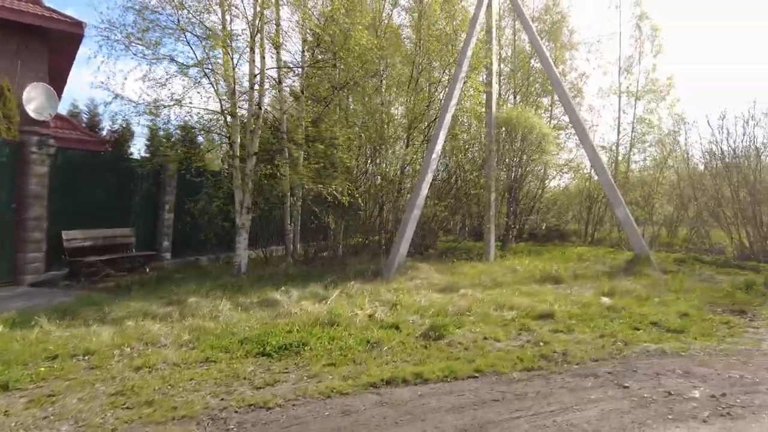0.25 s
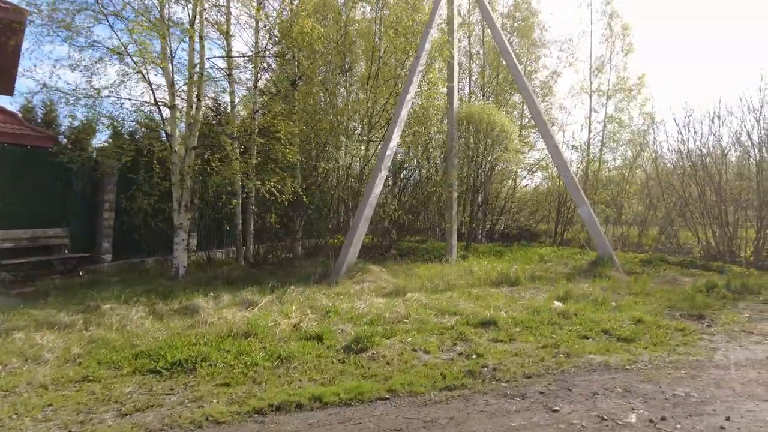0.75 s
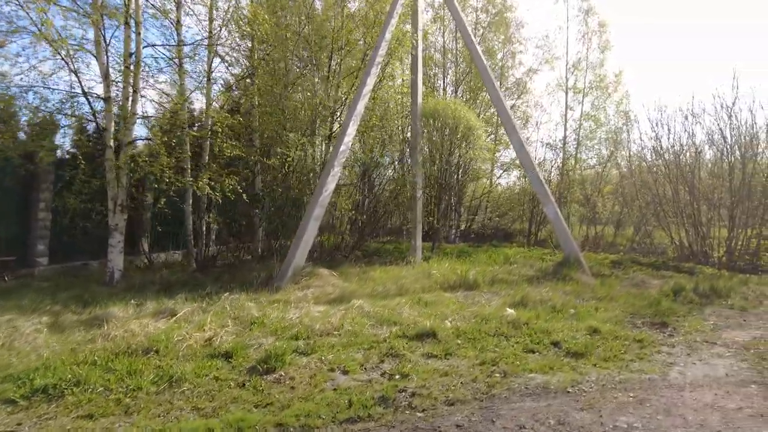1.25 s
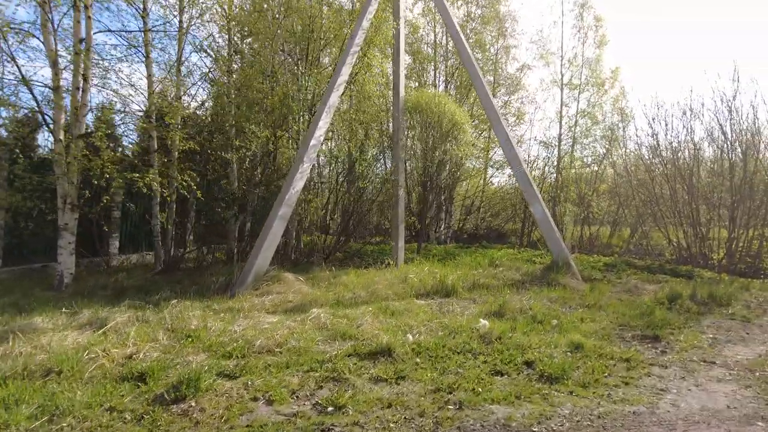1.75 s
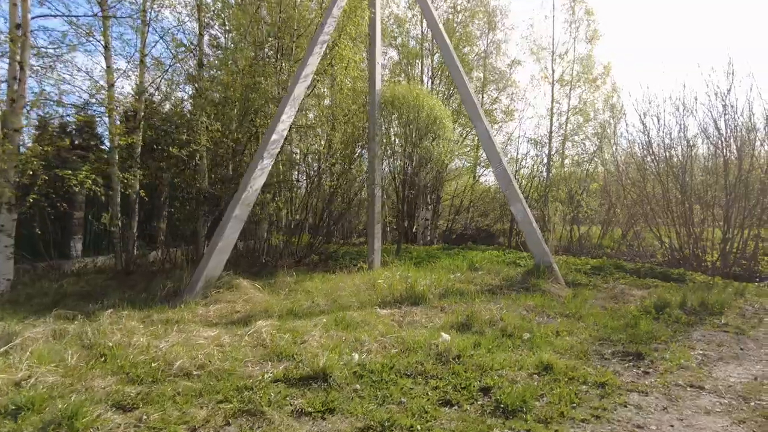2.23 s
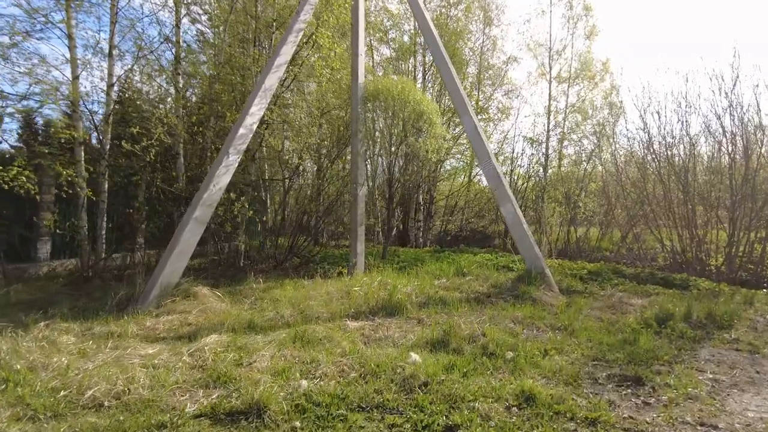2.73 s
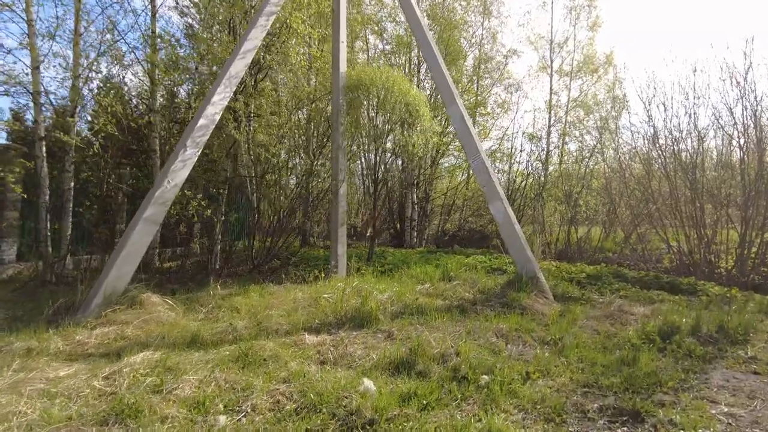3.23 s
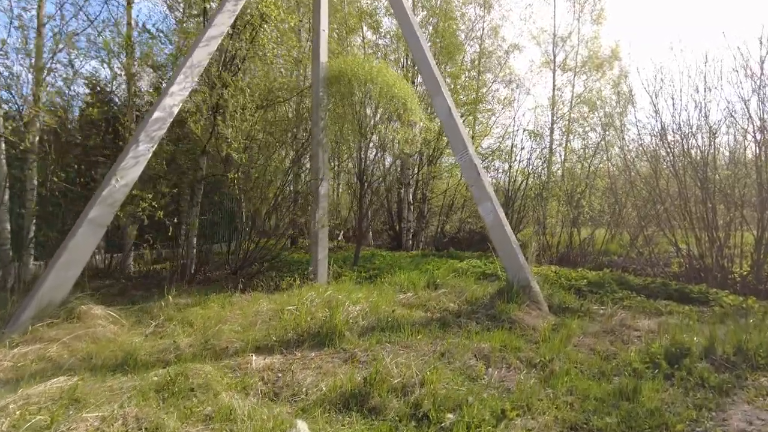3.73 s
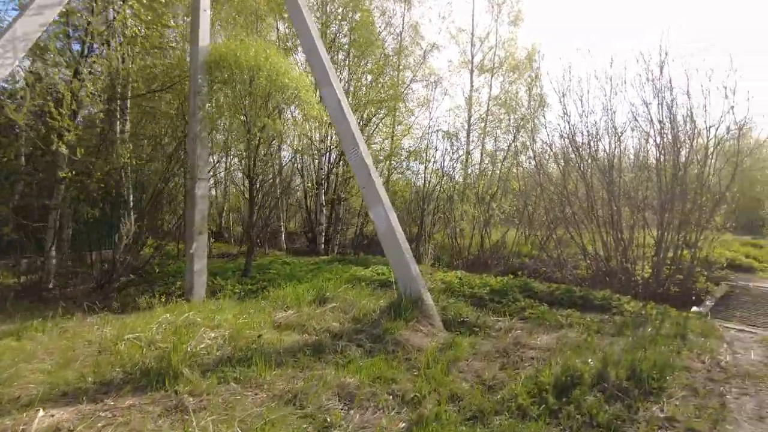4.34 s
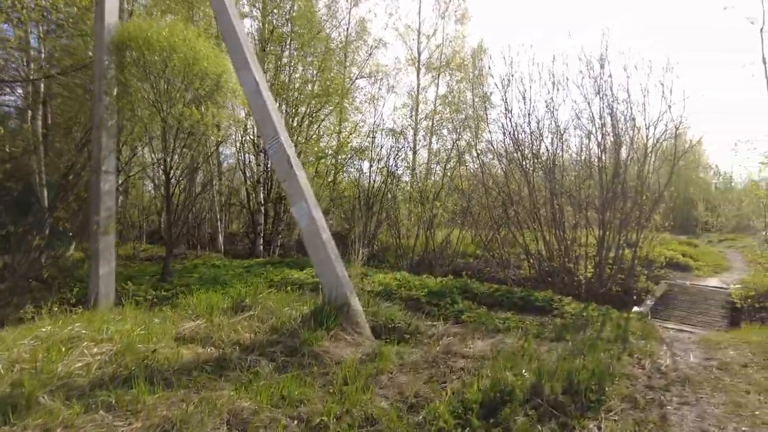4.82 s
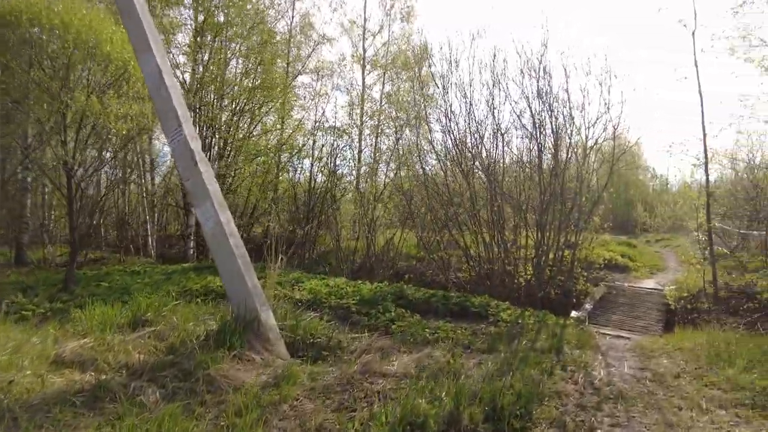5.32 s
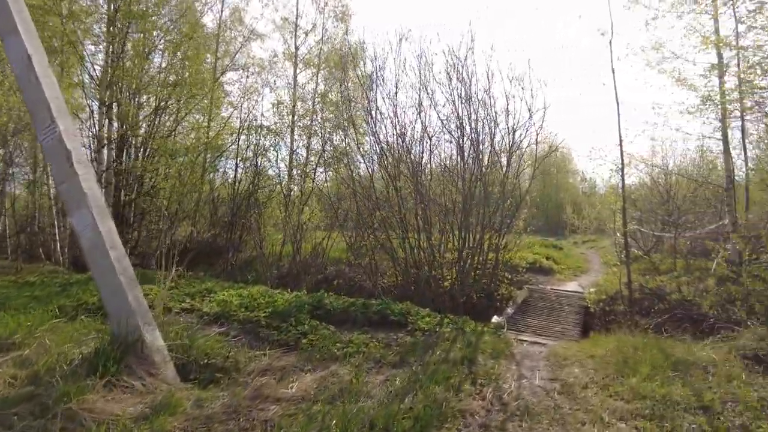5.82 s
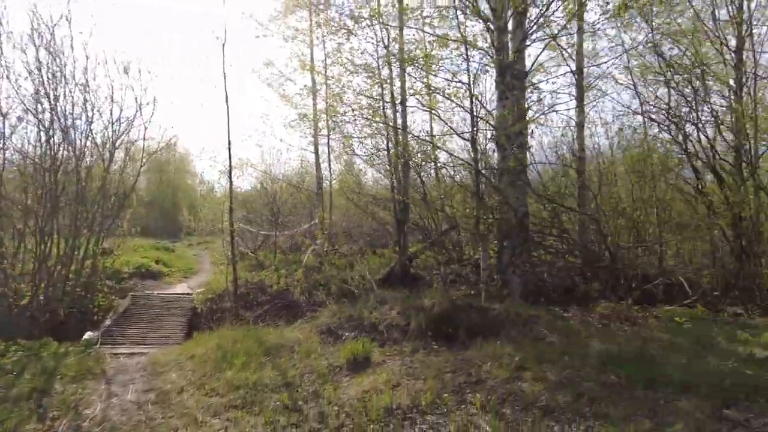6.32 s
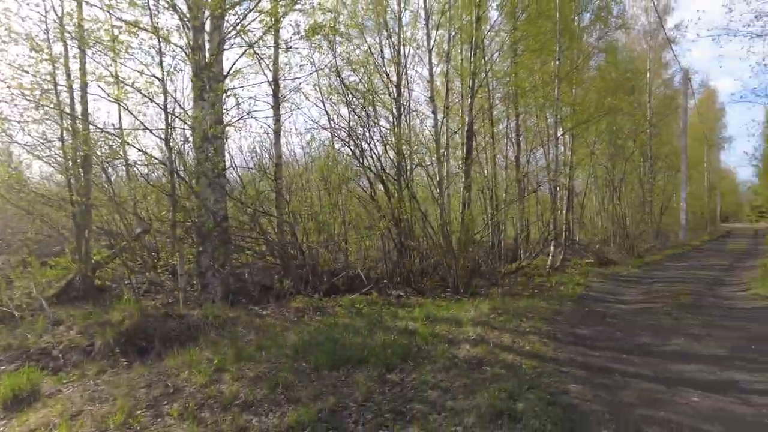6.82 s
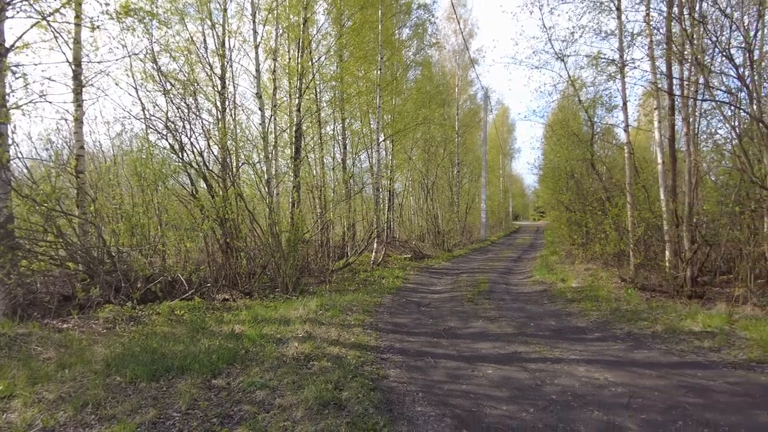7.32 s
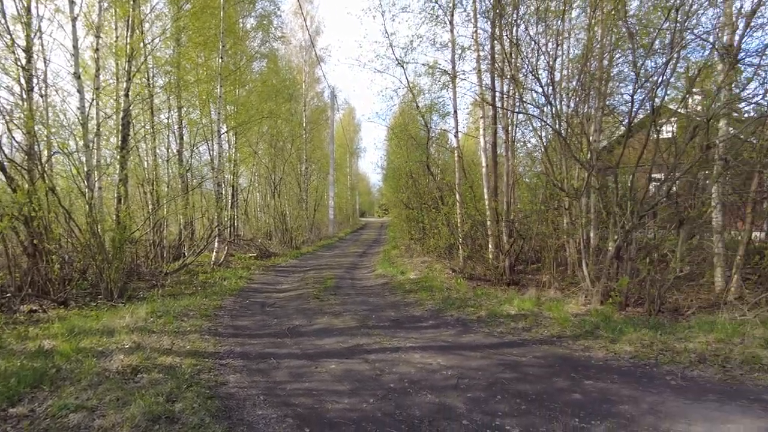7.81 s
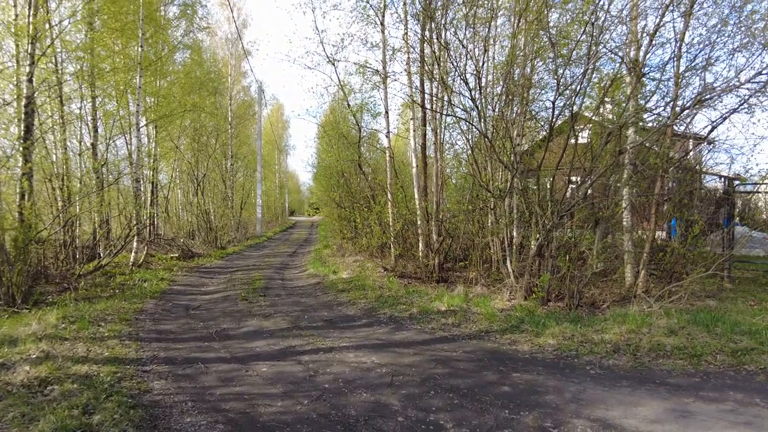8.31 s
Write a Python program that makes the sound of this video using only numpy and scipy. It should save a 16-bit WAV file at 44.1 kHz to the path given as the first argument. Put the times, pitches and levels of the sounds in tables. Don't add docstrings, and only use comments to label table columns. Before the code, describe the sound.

Outdoors by a birch wood, small birds whistle in quick sliding notes above a distant low rumble. After two seconds a sharp plastic snap starts rough handling: dull footstep thuds, creaking grip, hard pops, scrapes and swishing sleeve and grass. It calms after six seconds into a bubbling bird trill, a faint passing car, a tiny ping and thin chirps. Close stereo microphones in the hand.

```python
import sys
import numpy as np
from scipy import signal
from scipy.fft import rfft, irfft, next_fast_len
from scipy.io import wavfile
from scipy.ndimage import uniform_filter1d

SR = 44100
rng = np.random.default_rng(int(sys.argv[2]) if len(sys.argv) > 2 else 0)


def to_wav(sig):
    pcm = np.clip(np.atleast_2d(sig), -1, 1) * 32767
    pcm = np.round(pcm).astype(np.int16)
    wavfile.write(sys.argv[1], SR, pcm.T)


def nominal_scale(level):
    x = np.asarray(level, float) / 20
    return 10 ** x


N = 377471

# f/Hz, density/dB per Hz
CRACK_BAND = [(1500, -27), (2600, 4), (5200, -4), (7500, -28)]
# f/Hz, density/dB per Hz
SPARK_BAND = [(4500, -32), (6500, -1), (13500, -8.5), (16500, -25)]


def colour(x, points):
    hz, db = np.transpose(points)
    size = next_fast_len(N)
    f = np.maximum(np.arange(size // 2 + 1) * SR / size, 1)
    gain = nominal_scale(np.interp(np.log(f), np.log(hz), db)) * (f <= hz[-1])
    y = irfft(rfft(x, size) * gain, size)[..., :N]
    return y / np.sqrt(np.mean(y ** 2))


def walk(rate):
    hold = int(SR / rate)
    levels = np.repeat(rng.standard_normal(N // hold + 1), hold)
    return 2.0 * uniform_filter1d(uniform_filter1d(levels, hold), hold)[:N]


def ports(mid, side):
    return np.array([mid + side, mid - side])


def lean(sound, left_db):
    return sound * nominal_scale(np.array([[left_db], [-left_db]]))


def add(out, s, sound, pan_db=0, lag=0):
    sound = np.broadcast_to(sound, (2, sound.shape[-1]))
    for ch, (start, db) in enumerate([(int(s * SR) + lag, pan_db / 2), (int(s * SR), -pan_db / 2)]):
        part = sound[ch, :max(N - start, 0)]
        out[ch, start:start + len(part)] += nominal_scale(db) * part


def grit(share, size_db):
    slips = (rng.random((2, N)) < share) * nominal_scale(size_db * rng.random((2, N)))
    return rng.standard_normal((2, N)) * (1 + slips[0] + slips[1] / 2)


def strokes(rows, rise_db_s, fall_db_s):
    t = np.arange(0, N / SR, .001)
    s, length, db, drift_db = np.transpose(rows)[:, :, None]
    shape = db + drift_db * np.clip((t - s) / length, 0, 1) - rise_db_s * np.maximum(s - t, 0)
    shape = shape - fall_db_s * np.maximum(t - s - length, 0)
    gains = nominal_scale(np.maximum(shape, -200))
    return np.interp(np.arange(N) / SR, t, np.sqrt(np.sum(gains ** 2, axis=0)))


def patchy(x, edges_hz, slow_db, quick_db):
    size = next_fast_len(N)
    spectrum = rfft(x, size)
    octave = np.log2(np.maximum(np.arange(size // 2 + 1) * SR / size, 1))
    centres = np.log2(edges_hz)
    out = 0
    for row in np.eye(len(centres)):
        band = irfft(spectrum * np.interp(octave, centres, row), size)[..., :N]
        out = out + band * nominal_scale(slow_db * walk(14) + quick_db * walk(90))
    return out


def grip_clicks():
    # t/s, peak/dB, crack over ring/dB, sparkle over ring/dB, left minus right/dB
    ticks = [
        (1.5812, -44.5, -20, -40, -15),
        (1.7748, -42.5, -7, -17, -7),
        (2.136, -44, -15, -30, 9),
        (3.0097, -41, -7, -21, 5),
        (4.931, -54, 10, 13.5, -12),
        (5.5424, -36, -0.5, -25, 6),
        (7.3644, -47, -4, -33, -20),
    ]
    # t/s, peak/dB, ring f/Hz, crack over ring/dB, left minus right/dB
    pops = [(2.303, -36.5, 1650, -24, 0), (2.794, -41, 2600, 2, 9), (3.2553, -24.5, 2730, -12, -9),
            (3.2589, -12.5, 1840, -14.5, -7.5), (3.2624, -19.5, 1980, -15, -8),
            (3.265, -21.5, 1890, -12.5, 7), (3.725, -33, 1830, -24, -6), (3.799, -26.5, 1800, -25, -12),
            (3.8206, -32, 1860, -24, -10), (3.8443, -28, 1780, -13, -14), (4.0017, -30, 1680, -6.5, -16),
            (4.0043, -31, 1750, -22, -8), (4.013, -22.5, 1600, -28, -1), (4.0227, -29, 1820, -17, -22),
            (7.365, -41, 1570, -24, -22), (7.37, -50, 1600, -20, -10)]
    tick_hz, flex_hz, flex_db, t60_s = 1280, 970, -15, 0.015
    out, t = np.zeros((2, N)), np.arange(SR // 8) / SR
    hiss = colour(rng.standard_normal((2, N)), CRACK_BAND)
    fizz = colour(rng.standard_normal((2, N)), SPARK_BAND)
    flash = np.exp(-((t - .0008) / 0.00043) ** 2)
    fade = (1 - np.exp(-t / 0.0009)) ** 2 * np.exp(-np.log(1000) * t / t60_s)
    fade = fade / fade.max()
    every = [(s, db, tick_hz, crack, spark, pan) for s, db, crack, spark, pan in ticks]
    every += [(s, db, hz, crack, crack - 5.5, pan) for s, db, hz, crack, pan in pops]
    for s, db, hz, crack_db, spark_db, pan_db in every:
        here = slice(int(s * SR), int(s * SR) + len(t))
        shell = np.sin(2 * np.pi * hz * t) + 0.67 * np.sin(2 * np.pi * 0.916 * hz * t)
        crack = 0
        for band_db, band in ((crack_db, hiss), (spark_db, fizz)):
            burst = band[:, here] * flash
            crack = crack + nominal_scale(band_db) * burst / np.abs(burst).max()
        add(out, s, nominal_scale(db - 8.5) * (shell * fade + nominal_scale(13.0) * crack), pan_db)
        flex = np.sin(2 * np.pi * flex_hz * t) * fade
        add(out, s, nominal_scale(db + flex_db) * ports(0, flex))
    return out


def catch_snap():
    # f/Hz, level/dB, swell/s
    shell_modes = [(428, -22, 0.00074), (1385, -8, 0.00049), (1600, -7.5, 0.00053), (2950, -21.5, 0.00067),
                   (4200, -17.5, 0.00045), (4900, -26.5, 0.00054), (6230, -37, 0.00056),
                   (7670, -26.5, 0.00032), (13000, -18, 0.000093)]
    # f/Hz, level/dB, swell/s
    bend_modes = [(555, -24, 0.001), (917, -5, 0.00048), (2600, -23, 0.00039), (5200, -24, 0.00098),
                  (12900, -24, 0.00034)]
    snap_s, pan_db, crack_db, spark_db = 2.4307, -5, -24, -27
    out, t = np.zeros((2, N)), np.arange(SR // 20) / SR

    def ring(modes):
        total = 0
        for hz, db, swell in modes:
            envelope = (t / swell) ** 2 * np.exp(2 - t / swell) / 4
            total = total + nominal_scale(db) * envelope * np.sin(2 * np.pi * hz * t)
        return total

    add(out, snap_s, ring(shell_modes), pan_db)
    add(out, snap_s, ports(0, ring(bend_modes)))
    hiss = colour(rng.standard_normal((2, N)), CRACK_BAND)[:, :len(t)]
    fizz = colour(rng.standard_normal((2, N)), SPARK_BAND)[:, :len(t)]
    burst = np.exp(-((t - .0009) / 0.00081) ** 2)
    add(out, snap_s, (nominal_scale(crack_db) * hiss + nominal_scale(spark_db) * fizz) * burst)
    return out


def arm_thuds():
    # t/s, length/s, level/dB, drift/dB
    jolts = [(.0, .6, -56.5, 3), (.672, 0.04, -48, 2.5), (1.155, 0.033, -45.5, -3), (1.45, 0.43, -58, 8.5),
             (2.05, 0.21, -59, 13), (2.425, 0.015, -44.5, 3.5), (2.5, 0.31, -49.5, 8),
             (2.91, 0.25, -39, -8), (3.2, 0.36, -44, 0), (3.64, 0.034, -38, -2), (3.72, 0.19, -46.5, 3.5),
             (3.98, 0.43, -46, -9.5), (5.46, 0.43, -62, -6)]
    # f/Hz, density/dB per Hz
    thud_band = [(53, -46), (90, 2.5), (162, -5), (220, -8.5), (297, -12), (350, -11), (900, -24),
                 (1170, -45), (1980, -120)]
    rest_db = -67.5
    jolt = np.hypot(nominal_scale(rest_db), strokes(jolts, rise_db_s=404, fall_db_s=88))
    mid, side = colour(rng.standard_normal((2, N)), thud_band) * jolt * nominal_scale(2.4 * walk(50) - 2.7)
    return lean(ports(mid, nominal_scale(-14.0) * side), .6)


def low_knocks():
    # t/s, peak/dB, f/Hz, t60/s
    knocks = [(0.154, -42, 263, 0.047), (0.672, -42, 600, 0.02), (0.676, -43.5, 235, 0.059),
              (1.154, -47, 500, .03), (1.171, -45, 151, 0.067), (2.427, -29, 237, 0.065),
              (2.785, -36, 146, 0.12), (3.008, -35, 184, 0.061), (2.929, -40, 375, 0.026),
              (3.202, -29.5, 119, 0.047), (3.2584, -27.5, 334, 0.035), (3.647, -26.5, 216, 0.079),
              (4.742, -35.5, 222, 0.034), (5.543, -28, 610, 0.0034)]
    out, t = np.zeros((2, N)), np.arange(SR // 8) / SR
    for s, db, hz, t60 in knocks:
        add(out, s, nominal_scale(db) * np.sin(2 * np.pi * hz * t) * np.exp(-np.log(1000) * t / t60))
    return out


def grip_creaks():
    # t/s, length/s, level/dB, drift/dB
    slides = [(.09, 0.17, -64, -3.5), (.29, 0.054, -61.5, 7), (.68, 0.099, -66, 3), (.89, 0.055, -67, 0),
              (1.15, 0.19, -66, -5), (1.65, 0.22, -67, -4), (2.07, 0.23, -77, 17.5),
              (2.45, 0.37, -52.5, -1.5), (2.89, 0.064, -59.5, 5.5), (3.015, 0.056, -52.5, -2),
              (3.17, 0.069, -58.5, 5), (3.285, 0.3, -53, -13.5), (3.61, 0.17, -51, -2.5),
              (3.795, 0.15, -46.5, -5), (3.998, 0.1, -41.5, -16), (4.13, 0.052, -60.5, 8),
              (4.22, 0.14, -64, -13), (4.65, 0.088, -58.5, 2.5), (4.81, 0.064, -59, -2),
              (4.92, 0.69, -59.5, -5.5), (5.705, 0.078, -66, -4), (5.97, 0.36, -65, 3), (6.98, 0.3, -70, 9),
              (7.3, 0.5, -64, -8), (7.885, 0.085, -70, -5), (2.45, 1.3, -63, -7)]
    # f/Hz, density/dB per Hz
    creak_band = [(410, -10), (700, -8.5), (824, -5.5), (948, -11.5), (1490, -5), (1800, -3.5), (2110, -12),
                  (2690, -6), (3450, -11), (4500, -17), (5850, -15.5), (9900, -120)]
    slide = strokes(slides, rise_db_s=795, fall_db_s=600)
    creak = colour(grit(share=0.0037, size_db=-1.0), creak_band) * slide * nominal_scale(1.37 * walk(80) + 1.47)
    return lean(patchy(creak, [700, 1440, 2450, 4000], slow_db=1.3, quick_db=1.43), -1.6)


def scrapes():
    # t/s, length/s, f/Hz, width/Hz, level/dB
    edges = [(0.31, 0.041, 1880, 1800, -51.5), (.315, 0.049, 1320, 500, -54),
             (2.423, 0.013, 1500, 2000, -42), (2.46, .09, 1600, 600, -59), (2.556, 0.11, 1700, 600, -52),
             (2.682, 0.079, 1660, 600, -64), (2.566, 0.09, 6000, 4000, -59), (2.68, 0.039, 9000, 4000, -52),
             (2.746, 0.077, 3130, 1500, -47), (2.758, 0.076, 9000, 5000, -68),
             (3.001, 0.088, 4900, 1300, -50.5), (3.312, 0.098, 4500, 3560, -49),
             (3.463, 0.083, 3560, 1990, -52.5), (3.584, 0.31, 3800, 2500, -51.5),
             (3.723, 0.23, 1920, 603, -47), (3.844, 0.078, 2680, 500, -47.5),
             (3.983, 0.075, 1190, 490, -43), (4.057, 0.026, 6000, 2000, -48),
             (4.13, 0.017, 9500, 1500, -47), (4.146, 0.063, 2640, 2000, -52),
             (4.263, 0.024, 9700, 6000, -51.5), (4.303, 0.031, 8000, 7000, -59.5),
             (4.358, 0.017, 8000, 6000, -54.5), (4.582, 0.027, 9500, 7000, -55.5),
             (4.682, 0.042, 2200, 2000, -62), (4.808, .045, 1900, 1600, -52.5),
             (4.966, 0.042, 3470, 2500, -54), (5.074, 0.08, 3000, 1300, -57),
             (5.15, 0.034, 5760, 2500, -50), (5.135, 0.042, 9500, 5000, -62),
             (5.244, 0.27, 6050, 1480, -49), (5.394, 0.059, 8000, 7000, -51),
             (5.387, 0.048, 2500, 1500, -56), (5.504, 0.14, 5460, 2500, -59),
             (6.211, .025, 11000, 7000, -65), (6.266, 0.076, 9000, 9000, -62),
             (7.2, 0.086, 3470, 2600, -57)]
    # t/s, length/s, f/Hz, width/Hz, level/dB
    further_scrapes = [
        (2.83, 0.061, 2900, 1600, -62.5),
        (3.08, 0.089, 5200, 2000, -60),
        (3.545, 0.075, 3600, 1800, -59),
        (3.6, .15, 2800, 400, -55),
        (3.715, 0.042, 1750, 300, -54),
        (4.085, .06, 2950, 900, -56),
        (4.2, 0.08, 3280, 1600, -67),
        (4.39, .16, 2950, 1300, -66),
    ]
    out = np.zeros((2, N))
    rough = grit(share=0.0061, size_db=16.5) * nominal_scale(1.4 * walk(90))
    for s, length, hz, width_hz, db in edges + further_scrapes:
        band = signal.butter(2, [hz - width_hz / 2, hz + width_hz / 2], "band", fs=SR, output="sos")
        burst = signal.sosfilt(band, rough[:, int(s * SR):int((s + length) * SR)])
        shape = np.sin(np.pi * np.linspace(0, 1, burst.shape[1]) ** 0.91) ** .5
        add(out, s, nominal_scale(db) * burst / burst.std() * shape, pan_db=-1.5)
    return out


def brushing():
    # t/s, length/s, level/dB, drift/dB
    brushes = [(.0, 0.21, -80.5, -2), (.28, 0.032, -80, 16.5), (.905, 0.041, -81, -3),
               (1.15, 0.15, -83.5, 2), (2.01, 0.11, -81, -1), (2.19, 0.14, -75, 6),
               (2.44, 0.046, -53.5, -8), (2.5, 0.32, -61.5, 8), (2.785, 0.071, -49, -10),
               (2.87, 0.079, -66, 5.5), (3.015, 0.067, -56.5, -2), (3.15, 0.39, -58, -6.5),
               (3.6, 0.31, -58, 0.5), (3.9, 0.28, -58.5, 0), (4.265, 0.049, -65, -10),
               (4.357, 0.18, -67, 0), (4.585, 0.028, -63, -6), (4.62, 0.52, -65, -10),
               (5.13, 0.033, -69, 16), (5.2, 0.033, -61.5, 5), (5.26, 0.216, -53.5, 1.5),
               (5.49, 0.16, -54, -14), (5.69, 0.078, -62.5, 3), (5.85, 0.15, -74, 9), (6.15, 0.17, -87, 23),
               (2.45, 3.76, -68, -7.5), (6.962, 0.043, -67, -2), (7.06, 0.33, -76, 2.5),
               (7.39, 0.11, -66.5, 3), (7.53, 0.24, -68, -13.5)]
    # f/Hz, density/dB per Hz
    swish_band = [(2120, -46), (3600, -23), (4410, -0.5), (5970, -4.5), (6970, -6), (11500, -7.5),
                  (12600, -11), (15800, -11.5)]
    brush = strokes(brushes, rise_db_s=903, fall_db_s=602)
    swish = colour(grit(share=0.0023, size_db=9), swish_band) * brush * nominal_scale(1.5)
    swish = patchy(swish, [4500, 6500, 9000, 12500], slow_db=0.9, quick_db=1.45)
    return lean(ports(swish[0], swish[1]), .8)


def flecks():
    # t/s, peak/dB, f/Hz, left minus right/dB
    grains = [(.041, -52, 7500, 0), (.098, -48.5, 9000, 9), (.105, -44, 2700, -5), (.286, -52, 8000, 0),
              (.461, -54, 2800, -6), (.775, -54, 10000, 3), (.948, -53, 5800, -2),
              (1.583, -47.5, 2600, -10), (1.669, -48, 2500, -2), (1.746, -51, 5000, 0),
              (1.777, -47, 5500, -7), (2.067, -54, 4800, 0), (2.114, -52, 2780, 4), (2.136, -47, 2600, 4),
              (2.27, -48, 6500, 2), (2.294, -50, 2500, 0), (2.699, -38, 8000, 4), (2.794, -27, 8000, 10),
              (2.811, -33, 9000, 5), (2.935, -38, 5000, -12), (3.011, -40, 4600, -3), (3.26, -35, 4500, -6),
              (3.788, -46, 5000, -3), (4.004, -28, 6000, -8), (4.858, -44, 2000, 0), (5.225, -37, 8600, -8),
              (5.908, -47, 4500, -10), (6.612, -54, 4000, -4), (6.816, -48, 9500, -5),
              (6.816, -51, 3200, -5)]
    # t/s, peak/dB, f/Hz, left minus right/dB
    pings = [
        (7.3652, -40, 2980, -14),
        (7.3651, -35, 4500, -15),
        (4.3, -48, 8700, -4),
    ]
    out, t = np.zeros((2, N)), np.arange(-SR // 500, SR // 500) / SR
    for events, turns in ((grains, 0.93), (pings, 2.1)):
        for s, db, hz, pan_db in events:
            wavelet = np.sin(2 * np.pi * hz * t) * np.exp(-(t * hz / turns) ** 2)
            add(out, s + t[0], nominal_scale(db) * wavelet, pan_db)
    return out


def song(notes, bend, pan_db, lag_s, wobble_hz, echo_db, echo_s, rattle_hz=0):
    rattle_per_s, faint_hz_s = 80, 49300
    out = np.zeros((2, N))
    waver = wobble_hz * walk(300) + rattle_hz * np.sin(2 * np.pi * rattle_per_s * np.arange(N) / SR)
    for s, length, start_hz, end_hz, db in notes:
        u = np.arange(int(length * SR)) / (length * SR)
        left_to_go = (np.exp(-bend * u) - np.exp(-bend)) / (1 - np.exp(-bend))
        slide = end_hz + (start_hz - end_hz) * left_to_go
        strength = np.sin(np.pi * u) ** 0.3 / (1 + np.abs(np.gradient(slide)) * SR / faint_hz_s)
        hz = slide + np.roll(waver, -int(s * SR))[:len(u)]
        note = strength * np.sin(2 * np.pi * np.cumsum(hz) / SR)
        add(out, s, nominal_scale(db + 7.5) * note, pan_db, lag=int(lag_s * SR))
    t = np.arange(SR // 2) / SR
    trunks = rng.standard_normal((2, len(t))) * np.exp(-t / echo_s) * (t > .004)
    trunks = trunks / np.sqrt(np.sum(trunks ** 2, axis=1, keepdims=True))
    echo = signal.fftconvolve(out, trunks, axes=1)[:, :N]
    return out * nominal_scale(1.27 * walk(130)) + nominal_scale(echo_db) * echo


def birds():
    # t/s, length/s, start f/Hz, end f/Hz, level/dB
    warbler = [
        (.593, 0.051, 5920, 4360, -56.5),
        (.686, 0.046, 4800, 4200, -57),
        (.947, 0.022, 4680, 4080, -59),
        (6.152, 0.074, 7900, 7680, -62),
    ]
    dives = [
        (.77, 0.032, 4520, 4140, -56.5),
        (.798, 0.025, 4200, 3100, -64),
        (.922, 0.038, 4740, 4570, -63.5),
        (.97, .015, 3800, 3300, -74),
    ]
    risers = [
        (.826, 0.05, 3300, 4120, -60.5),
        (.99, 0.055, 3360, 4270, -60),
    ]
    gliders = [
        (1.608, 0.088, 4450, 5000, -78),
        (1.953, 0.05, 6950, 5300, -76),
        (2.138, 0.042, 6300, 5250, -71),
        (2.32, 0.058, 6360, 5360, -72),
        (2.33, 0.044, 5100, 4600, -78),
    ]
    thrush = [
        (6.962, 0.075, 7900, 5640, -70),
        (7.1, 0.04, 6370, 5330, -69.5),
        (7.615, 0.056, 4050, 4070, -71),
        (7.67, 0.031, 4120, 4070, -68),
        (7.905, 0.08, 4100, 4040, -77),
        (8.01, .06, 4080, 4080, -81),
        (8.262, 0.034, 7600, 5350, -59),
        (8.465, 0.038, 3650, 3130, -74),
    ]
    buzzer = [(.0, 0.04, 6050, 5840, -78), (.1, .05, 6140, 6050, -78), (.21, 0.04, 6500, 6500, -76),
              (.275, .025, 5200, 5340, -78), (.275, .025, 6500, 6400, -77), (.34, 0.06, 5960, 5970, -75),
              (.36, .05, 4900, 5100, -80), (.41, 0.042, 5740, 5700, -76), (.41, .045, 6650, 6540, -83)]
    rattler = [(.512, 0.024, 4950, 5430, -71), (.545, .02, 4900, 6400, -71), (.56, .035, 6200, 6000, -75),
               (.565, .03, 4750, 5200, -69), (8.165, 0.057, 4860, 7950, -69.5),
               (8.29, 0.074, 6030, 5900, -76), (8.35, 0.16, 4530, 4220, -70), (8.44, 0.13, 4680, 4660, -78)]
    # t/s, f/Hz, level/dB
    blips = [(6.453, 3750, -53), (6.464, 3680, -53), (6.487, 3810, -50), (6.496, 3040, -66),
             (6.506, 3600, -59), (6.534, 2950, -64), (6.548, 3680, -56), (6.557, 3270, -59),
             (6.573, 4000, -51.5), (6.594, 3480, -56), (6.609, 3700, -59), (6.623, 4000, -59),
             (6.632, 3130, -63), (6.644, 3530, -56), (6.664, 3230, -64), (6.687, 4230, -54),
             (6.694, 3300, -66), (6.707, 3170, -66), (6.744, 3660, -57), (6.769, 3690, -53),
             (6.858, 3740, -58)]
    trill = [(s, 0.011, hz + 100, hz - 100, db) for s, hz, db in blips]
    out = song(warbler, 2.8, 0.84, .00006, 32, -11.5, 0.12)
    out += song(dives, -1.7, 1.3, .00006, 20, -16.0, 0.077)
    out += song(risers, 5.45, 1.2, .00006, 25, -12.0, 0.06)
    out += song(trill, 0.28, .3, .00013, 60, -13.0, 0.12)
    out += song(thrush, 2.4, 0.4, .00005, 25, -7.0, 0.08)
    out += song(gliders, 1.33, 1.2, .00006, 25, -8.0, .06)
    out += song(buzzer, -0.78, .3, .00007, 60, -7, 0.03)
    out += song(rattler, -0.78, 0, 0, 90, -3, .04, rattle_hz=330)
    return out


def passing_car():
    # f/Hz, density/dB per Hz
    tyres = [(500, -42), (780, -3), (860, -4.5), (960, -2.5), (1020, 2), (1100, -10), (1200, -11),
             (1700, -18), (2600, -40)]
    # t/s, f/Hz
    tread = [(6.349, 895), (6.499, 1000), (6.76, 1040), (6.83, 920), (6.92, 864), (7.08, 1015), (7.2, 980)]
    nearest_s, wide_s, car_db, whine_db, whine_width_hz = 6.785, 0.34, -58.5, -4.5, 68
    t = np.arange(N) / SR
    roar, roar_side = rng.standard_normal((2, N))
    passing = nominal_scale(car_db) * np.exp(-((t - nearest_s) / wide_s) ** 2 / 2)
    turn = 2 * np.pi * np.cumsum(np.interp(t, *np.transpose(tread))) / SR
    narrow = [(1, 0), (whine_width_hz / 2, 0), (2 * whine_width_hz, -30)]
    flutter = colour(np.array([roar, roar_side]), narrow)
    whine = flutter[0] * np.cos(turn) + flutter[1] * np.sin(turn)
    mid = colour(roar, tyres) + nominal_scale(whine_db) * whine
    return passing * ports(mid, nominal_scale(-4.0) * colour(roar_side, tyres))


def traffic_rumble():
    # t/s, length/s, level/dB, drift over the swell/dB
    swells = [
        (.25, 0.77, -45, 2),
        (1.17, 0.63, -53.5, 12.5),
        (2.425, .02, -38, 7),
        (2.62, 0.7, -44, 3),
        (3.66, 0.736, -34, -5.5),
        (5.96, 0.082, -49, 13.5),
    ]
    # f/Hz, density/dB per Hz
    rumble_band = [(8.8, -31), (15, -2.5), (40, 0), (50, 6.5), (57, -1.5), (65, 0.5), (92, -12.5),
                   (107, -11), (123, -32), (250, -43), (320, -34.5), (550, -120)]
    rest_db = -43
    lift = np.hypot(nominal_scale(rest_db), strokes(swells, rise_db_s=311, fall_db_s=146))
    return lift * colour(rng.standard_normal(N), rumble_band)


def open_air():
    # f/Hz, density/dB per Hz
    air_mid = [(71, -51), (120, -1.5), (177, -8.5), (461, -7), (627, -8.5), (817, -15.5), (1280, -11.5),
               (2180, -27.5), (2960, -26.5), (4350, -31.5), (7110, -39.5), (12300, -41.5), (15800, -46)]
    # f/Hz, density/dB per Hz
    air_side = [(12, -36), (20, -13), (81, -1), (181, -20), (443, -5), (967, 1.5), (1390, -15.5),
                (2170, -25), (4360, -24), (6100, -29.5), (7010, -33.5), (11000, -35), (15800, -42)]
    mid, side = rng.standard_normal((2, N))
    air = ports(nominal_scale(-59) * colour(mid, air_mid), nominal_scale(-57.5) * colour(side, air_side))
    return air * nominal_scale(0.89 * walk(17))


def scene():
    hand = grip_clicks() + catch_snap() + arm_thuds() + low_knocks() + grip_creaks()
    touch = scrapes() + brushing() + flecks()
    return hand + touch + birds() + passing_car() + traffic_rumble() + open_air()


def top_cut(x):
    return signal.sosfilt(signal.butter(12, 16810, fs=SR, output="sos"), x)


def record(dry):
    ceiling = .67
    mix = ceiling * np.tanh(dry / ceiling)
    return top_cut(mix)


dry = scene()
out = record(dry)
to_wav(out)
```